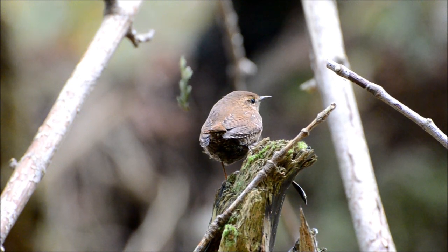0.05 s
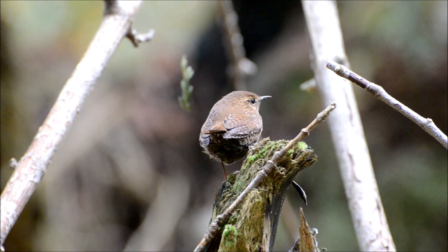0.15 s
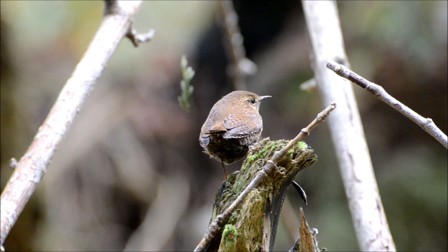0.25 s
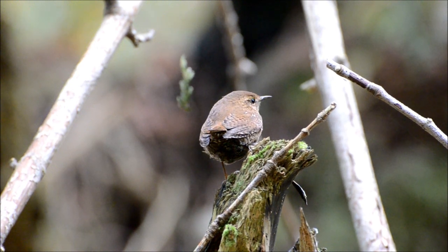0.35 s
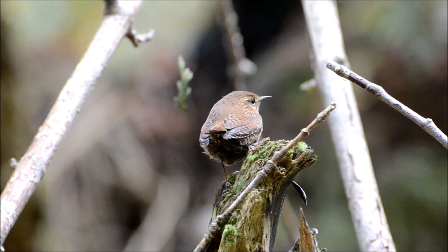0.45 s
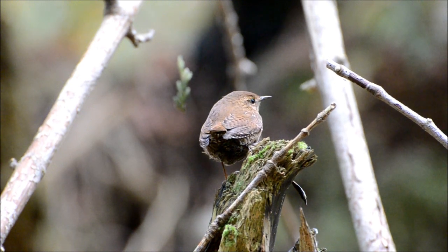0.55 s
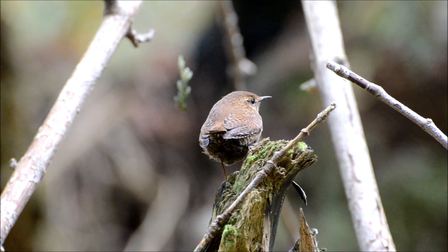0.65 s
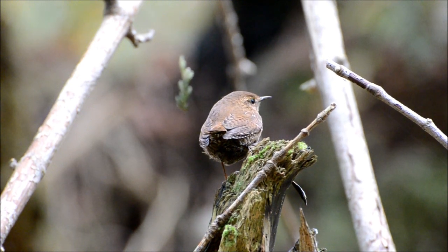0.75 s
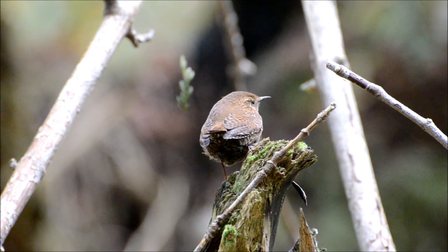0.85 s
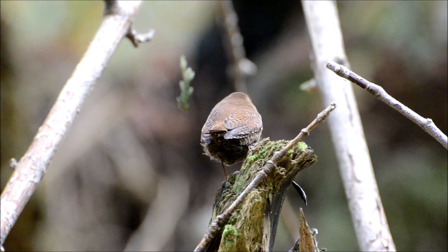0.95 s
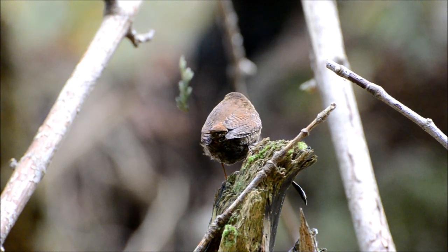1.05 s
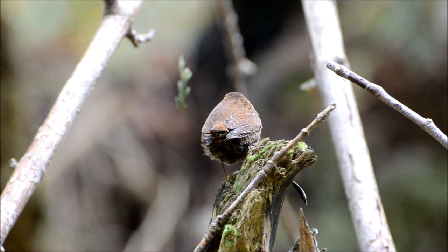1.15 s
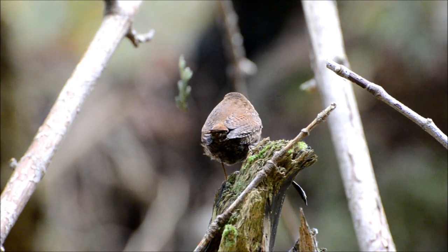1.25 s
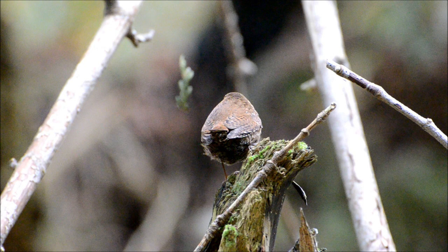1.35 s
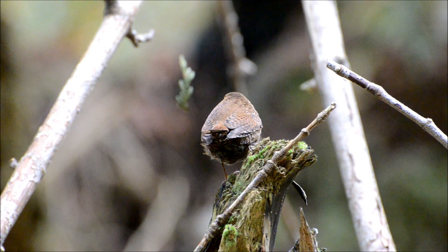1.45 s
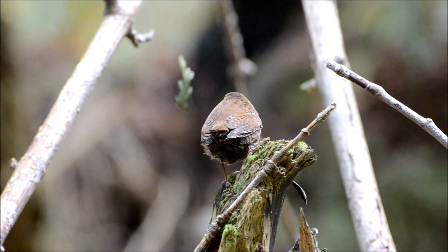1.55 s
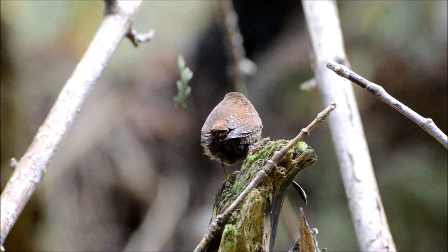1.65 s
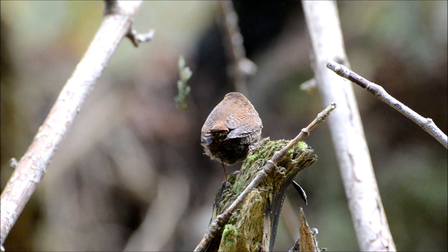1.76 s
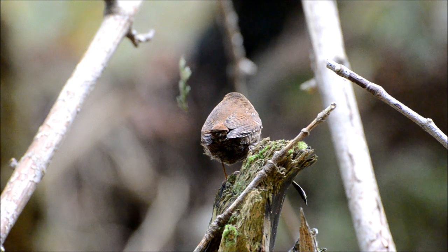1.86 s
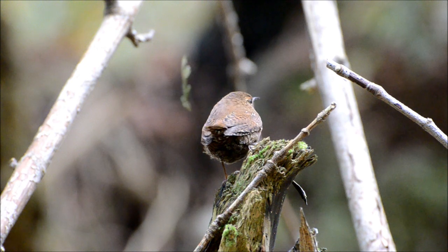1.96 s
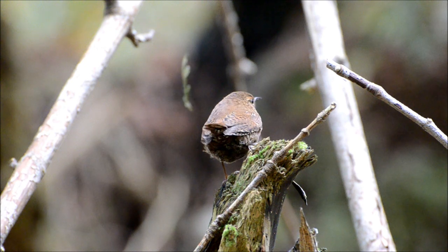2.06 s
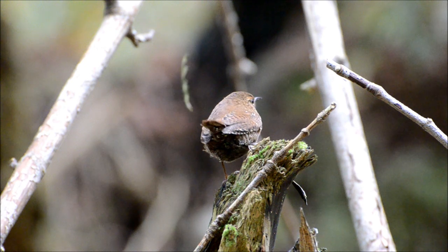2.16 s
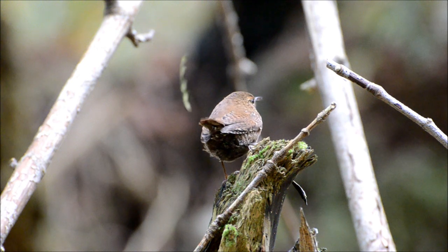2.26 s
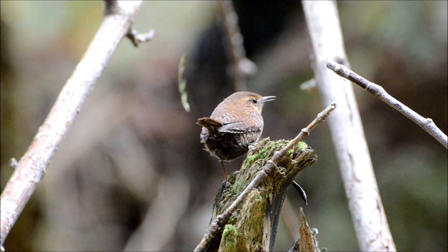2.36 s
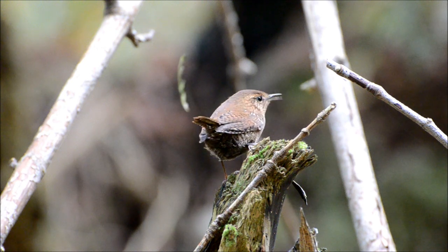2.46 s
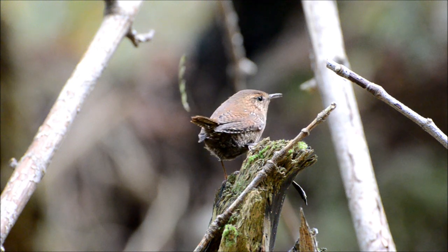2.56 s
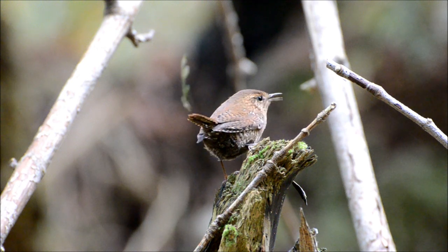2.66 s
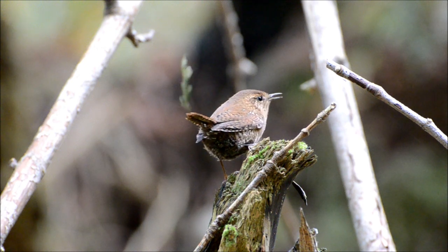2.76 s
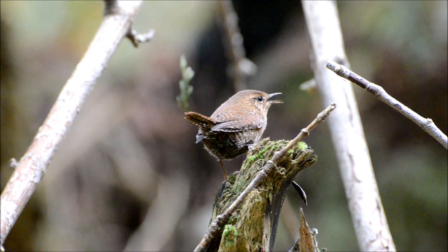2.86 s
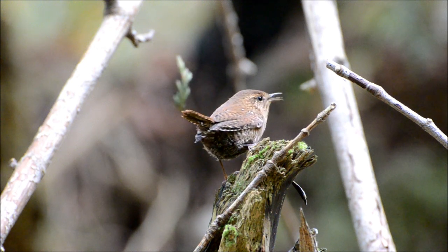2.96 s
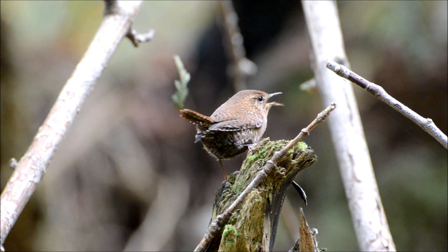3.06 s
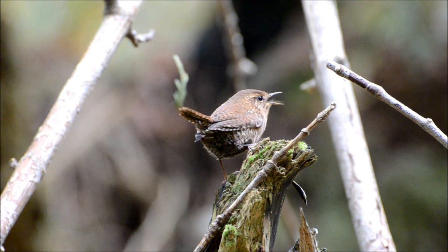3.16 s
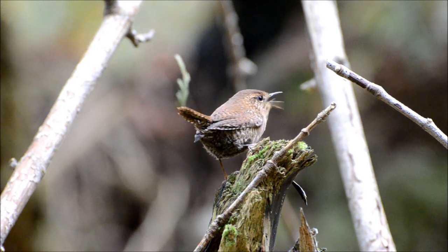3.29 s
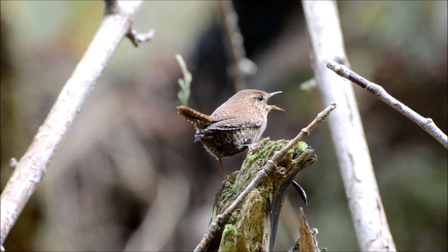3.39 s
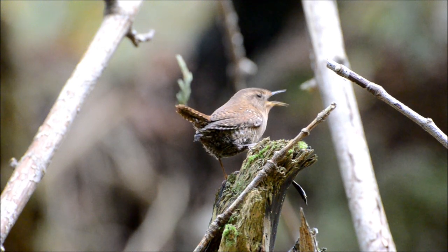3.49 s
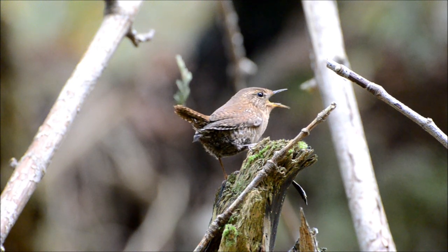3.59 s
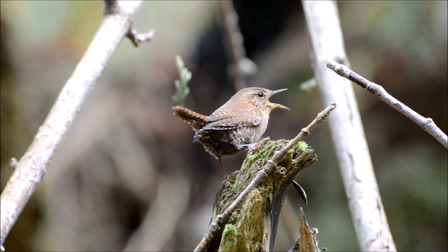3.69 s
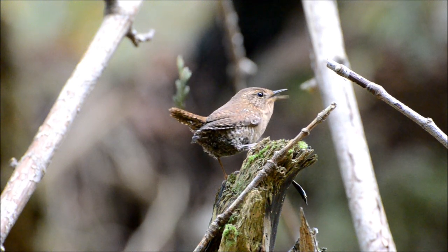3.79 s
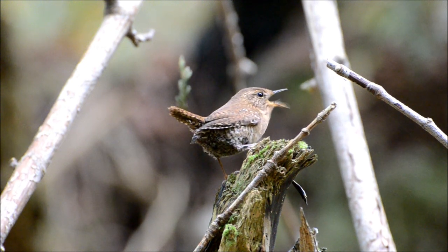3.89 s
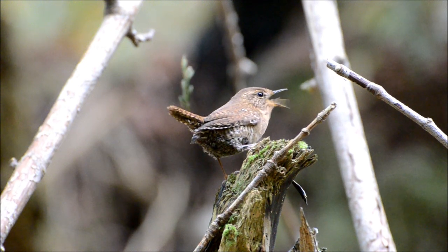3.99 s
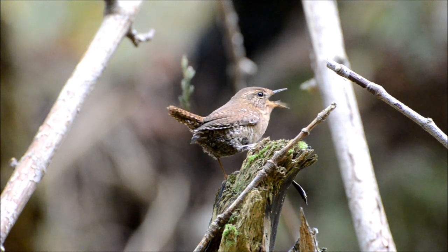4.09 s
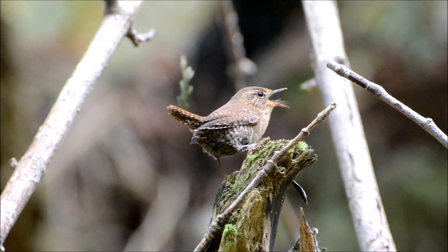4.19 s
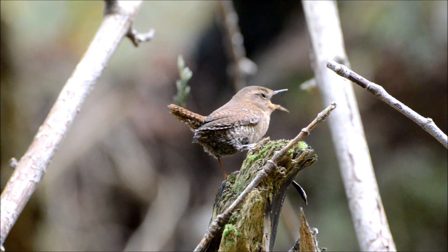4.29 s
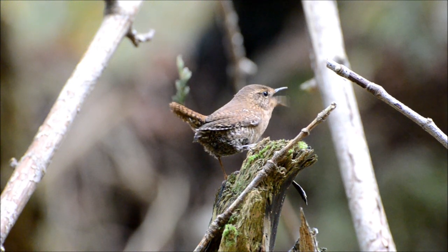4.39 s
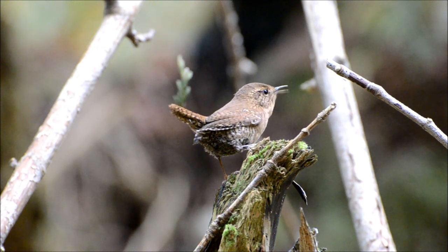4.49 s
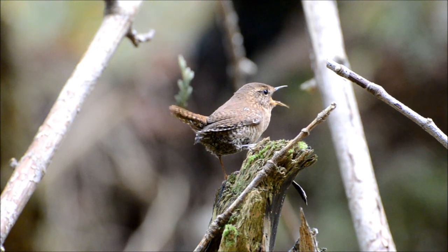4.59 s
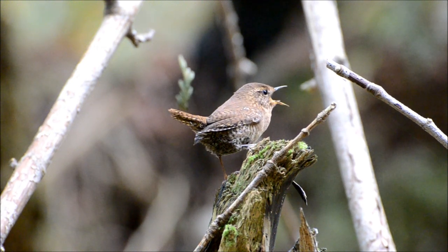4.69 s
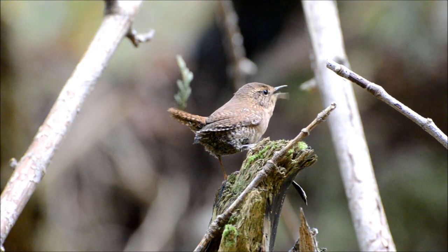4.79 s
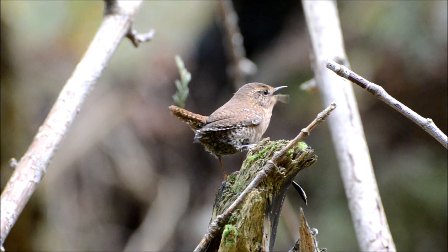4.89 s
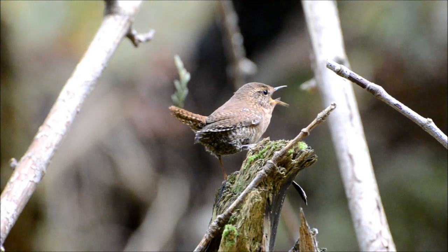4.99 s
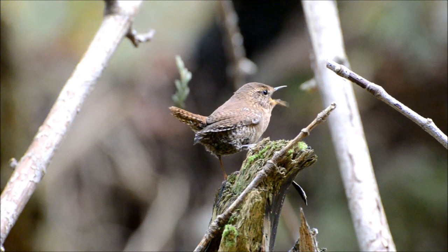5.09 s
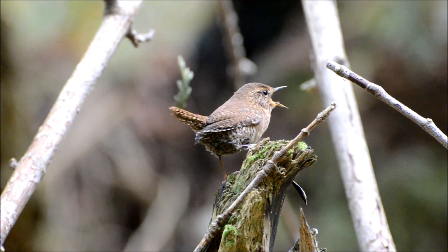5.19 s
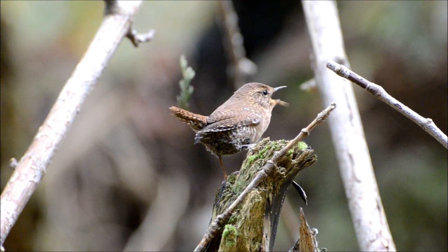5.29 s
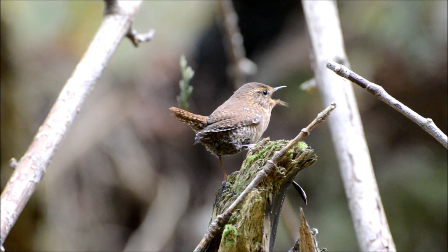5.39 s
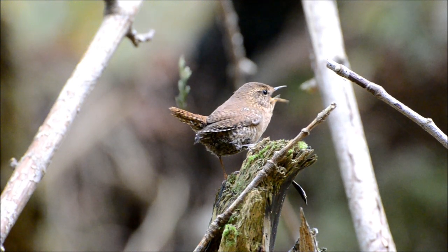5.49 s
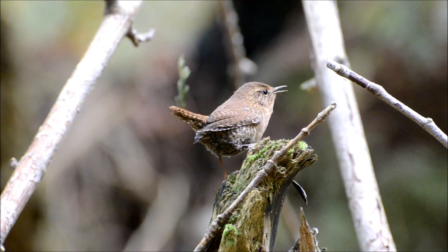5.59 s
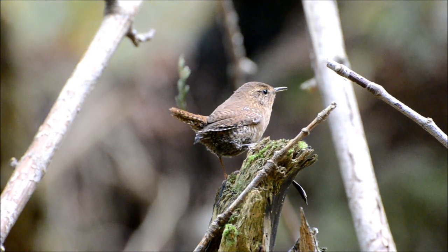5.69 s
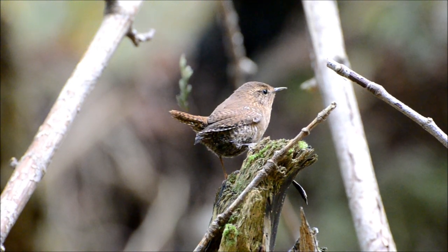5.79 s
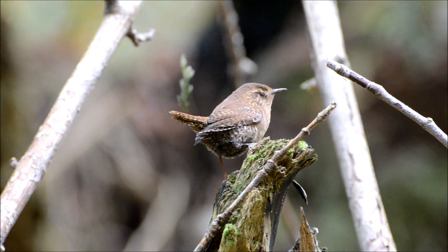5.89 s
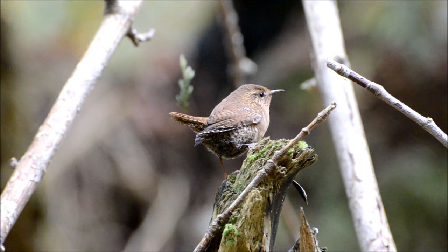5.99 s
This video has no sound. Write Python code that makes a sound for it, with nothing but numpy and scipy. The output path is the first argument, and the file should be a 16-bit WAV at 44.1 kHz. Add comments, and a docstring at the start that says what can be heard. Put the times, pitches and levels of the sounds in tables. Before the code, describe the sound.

First only a low, soft distant roar and a few faint, trembling high whistles from far birds, plus a couple of tiny dry clicks. Then one nearby small bird sings a single continuous song, quiet at first, soon bright and piercing, with fast bouncing, sliding and buzzing notes. It ends suddenly, leaving a brief woodland reverberation and the faint roar. Mono, outdoors.

```python
"""Wren song in a forest

A wren close by sings one tumbling song: a single sine whistle gliding along drawn pitch contours, with faint
overtones and a rasp on fast slides. Noise-like echoes that die away scatter it among the trees.
Thin, blurred whistles of far birds, trembling sine glides, come mostly before it.
Two faint ticks, filtered clicks, and a dull distant roar of coloured noise lie underneath."""
import sys
import numpy as np
from scipy import signal
from scipy.fft import rfft, irfft
from scipy.io import wavfile

SR = 44100
rng = np.random.default_rng(int(sys.argv[2]) if len(sys.argv) > 2 else 0)


def store_wav(level_fs):
    """Save 16-bit WAV to argv[1]."""
    pcm = np.round(np.clip(np.atleast_2d(level_fs), -1, 1) * 32767)
    wavfile.write(sys.argv[1], SR, pcm.T.astype(np.int16))


def convert_level_to_amplitude(level_db):
    """Map a level in decibels to its linear amplitude factor."""
    exponent = np.asarray(level_db, float) / 20
    return 10 ** exponent


N = 266496      # length in samples


def rms_one(x):
    """Scales a signal to an rms of one."""
    return x / np.sqrt(np.mean(x ** 2) + 1e-20)


def smooth(x, ms):
    """A raised-cosine running mean."""
    window = np.hanning(int(ms * SR / 1000) + 3)
    return signal.fftconvolve(x, window / window.sum(), "same")


def random_drift(size, ms):
    """Slow random wandering with an rms of one: smoothed white noise."""
    return rms_one(smooth(rng.standard_normal(size), ms))


def roar():
    """A dull distant roar: smooth noise, humped near 800 Hz, swelling as a whole."""
    # Colour of the roar. Each row: frequency in Hz, relative density in dB per Hz.
    roar_colour = [(20, -12.5), (65, -11), (150, -9.5), (225, -2.5), (450, -6.5), (780, 0), (1150, -3.5),
                   (1600, -12.5), (2600, -25), (5000, -39.5), (5450, -40), (5750, -52.5), (6050, -40),
                   (8500, -38), (11000, -48.5), (15000, -59)]
    # Slow swell of the roar. Each row: time in seconds, rms level in dB.
    roar_swell = [(0.0, -55.5), (3.77, -51.5), (6.04, -52.5)]
    hz, density_db = np.transpose(roar_colour)
    bin_hz = np.arange(1, N // 2 + 2) * SR / N
    colour = convert_level_to_amplitude(np.interp(np.log(bin_hz), np.log(hz), density_db))
    noise = rms_one(irfft(rfft(rng.standard_normal(N)) * colour, N))
    s, level_db = np.transpose(roar_swell)
    return noise * convert_level_to_amplitude(np.interp(np.arange(N) / SR, s, level_db))


def ticks():
    """Faint dry ticks: single-sample clicks, band-passed so that the lows are missing."""
    # Ticks nearby. Each row: time in seconds, click height in dB before the filter.
    tick_list = [(1.055, -53), (1.25, -57)]
    clicks = np.zeros(N)
    for s, db in tick_list:
        clicks[int(s * SR)] = convert_level_to_amplitude(db)
    band = signal.butter(2, [2500, 7000], "band", fs=SR, output="sos")
    return signal.sosfilt(band, clicks + 1e-18)


def far_birds(blur_hz=150, flutter_db=3.5):
    """Each thin whistle arrives smeared: a sine glide whose pitch trembles at random."""
    # Far whistles. Each row: start in seconds, length in seconds, pitch at the start in Hz,
    # pitch at the end in Hz, level in dB before flutter and mix.
    far_whistles = [(0, .06, 8900, 8850, -93), (0.093, 0.41, 7550, 8100, -85),
                    (0.666, 0.063, 8700, 8800, -85), (0.824, 0.22, 7700, 7900, -82.5),
                    (0.945, 0.57, 9000, 8300, -92), (1.014, 0.16, 8320, 7950, -74),
                    (1.087, .04, 8600, 8700, -81), (1.205, 0.094, 8070, 7850, -69.5),
                    (1.352, 0.15, 7680, 7500, -82), (1.403, 0.12, 8450, 8350, -84),
                    (1.58, 0.18, 8400, 8300, -94), (1.915, 0.042, 8500, 8500, -81),
                    (2.019, 0.022, 9000, 8800, -80), (2.09, .02, 9000, 8750, -91)]
    out = np.zeros(N)
    tremble = blur_hz * random_drift(N, 5.0)
    for s, length, start_hz, end_hz, db in far_whistles:
        span = slice(int(s * SR), int((s + length) * SR))
        size = span.stop - span.start
        pitch = np.linspace(start_hz, end_hz, size) + tremble[span]
        whistle = np.sin(2 * np.pi * np.cumsum(pitch) / SR)
        out[span] += convert_level_to_amplitude(db) * signal.windows.tukey(size, .4) * whistle
    return out * convert_level_to_amplitude(flutter_db * random_drift(N, 25.0))      # the level flutters


def strokes():
    """Every unbroken stroke of the whistle as rows (s, Hz, dB), in the order sung."""
    # Syllables that return, by name; each is a few strokes. Each row of a stroke: time in ms before stretch,
    # pitch in Hz before the pitch factor, level in dB over the syllable's level.
    syllables = { "bounce": [[(0, 6700, -12), (7.2, 6400, -4.5), (14.87, 6430, -2), (21.8, 6780, -4),
                 (27.4, 6550, -1)]], "tumble": [[(0, 5450, -11), (3.5, 6300, -2), (8, 6600, 0),
                 (11.5, 6100, -3)], [(17.27, 5600, -9), (23, 5000, 6), (27.9, 3600, -20)], [(35, 6000, -2),
                 (38.8, 7050, -1), (50.5, 7700, -3.5), (58.8, 7500, 1.5), (68.2, 7100, 3.5)]],
                 "arch": [[(0, 7240, -14), (6, 7740, -6.5), (20.1, 7850, 0), (39.5, 7655, -10.5),
                 (54, 7250, -3.5)]], "flick": [[(0, 3300, -30), (3, 4900, -7), (6, 5250, -0.5),
                 (9, 4900, -8)], [(12, 5950, -4.5), (15, 5280, -4), (18, 5180, -6.5)]],
                 "slide": [[(0, 7330, -12), (3.85, 6850, -3.5), (13.72, 6490, -0.5), (24.2, 5930, -0.5),
                 (28.9, 5600, -14)]], "plunge": [[(0, 5900, -11), (3.5, 6500, -3), (7, 6580, -1),
                 (10.5, 6180, -9)], [(16.4, 6450, -3), (20.5, 5450, 0.5), (25.5, 4000, -23),
                 (30.2, 5700, -3.5), (37.3, 6100, 4)], [(42.3, 8160, -9.5), (52, 7530, 1.5),
                 (68.4, 7760, -5), (84, 7520, -4), (92.5, 7085, 1.5), (98, 6850, -11), (104, 6800, -11)]],
                 "pair": [[(0, 6600, -12), (4, 6750, -3), (10, 6750, -3)], [(11.95, 9170, -29),
                 (15.34, 7530, -0.5), (26.84, 7380, -3.5)]], }
    # Where they are sung. Each row: start in seconds, syllable name, level in dB before the mix,
    # stretch in time (ratio), pitch factor (ratio).
    sung = [(2.346, "bounce", -50, .92, 1.001), (2.618, "bounce", -43, .99, .999),
            (3.054, "tumble", -36.5, 1.04, 1.002), (3.148, "tumble", -35, .99, 1.017),
            (3.245, "tumble", -34.5, 1.01, 1.025), (3.505, "arch", -23, 1.001, 1.002),
            (3.652, "arch", -23, .98, 1.005), (3.896, "flick", -28, 1.001, .999),
            (3.967, "flick", -30.5, 1.001, 1.007), (4.037, "flick", -29, 1.001, 1.006),
            (4.111, "flick", -31.5, .96, 1.001), (3.847, "slide", -28.5, 1.04, 1.02),
            (3.917, "slide", -28, 1.001, 1.002), (3.988, "slide", -28.5, .93, 0.997),
            (4.059, "slide", -27.5, .97, 1.017), (4.133, "slide", -27.5, .96, 1.025),
            (4.965, "plunge", -30, 1.015, 1.005), (5.099, "plunge", -30, 0.97, .999),
            (5.23, "pair", -28.5, .97, 1), (5.28, "pair", -28.5, 1.03, 1), (5.332, "pair", -31, .97, 0.98),
            (5.387, "pair", -30.5, 1.001, 1)]
    # Plain glides. Each row: start in seconds, length in ms, pitch from in Hz, pitch to in Hz,
    # peak level in dB before the mix.
    glides = [(1.919, 16, 5000, 4650, -68), (2.019, 51, 6190, 5300, -64), (2.099, 14.5, 4550, 4370, -61.5),
              (2.148, 26.6, 4660, 5400, -56.5), (2.182, 12, 4800, 4100, -57), (2.381, 8.5, 5710, 3820, -52),
              (2.389, 13, 3940, 5630, -52), (2.53, 24.6, 3660, 4420, -54.5), (2.688, 18, 5016, 3610, -41),
              (2.714, 15, 3510, 4360, -42), (2.909, 13, 5250, 3850, -39), (2.924, 7.2, 4280, 3450, -40.5),
              (3.461, 15.6, 4380, 5760, -31), (3.827, 2.5, 4780, 5340, -30), (3.831, 6, 6300, 5880, -34),
              (3.842, 4.3, 6230, 6050, -32.5), (4.469, 7.3, 3875, 2870, -43), (4.482, 6.2, 3510, 2870, -46),
              (4.493, 8.5, 3950, 4330, -37.5)]
    # Bent notes sung once, one contour each. Each row of a note: time in seconds, pitch in Hz,
    # level in dB before the mix.
    flourishes = [
        [(1.951, 2950, -71), (1.9613, 4400, -61), (1.9697, 5000, -64), (1.976, 5030, -67)],
        [(2.238, 6500, -70), (2.249, 7050, -57), (2.264, 6960, -54), (2.28, 6580, -53), (2.287, 6700, -53),
         (2.2965, 7720, -53.5), (2.309, 7060, -57)],
        [(2.448, 7940, -58), (2.4525, 8070, -47), (2.458, 7500, -66), (2.464, 7580, -51), (2.4777, 7890, -53.5),
         (2.491, 7100, -51)],
        [(2.563, 5100, -59), (2.568, 4450, -54), (2.5763, 4200, -46), (2.582, 4250, -47)],
        [(2.673, 5120, -53), (2.6795, 5460, -49), (2.686, 5160, -61)],
        [(2.764, 6960, -50.5), (2.7715, 8110, -40), (2.78, 8000, -43), (2.7915, 7140, -32), (2.803, 6920, -45),
         (2.815, 7030, -38.5), (2.826, 6960, -48.5)],
        [(2.853, 4590, -64), (2.857, 4820, -50.5), (2.873, 4510, -39), (2.885, 4490, -44)],
        [(2.938, 4387, -43), (2.9431, 4930, -41), (2.9499, 5230, -37), (2.955, 5130, -45.5)],
        [(2.977, 5880, -51), (2.99, 5880, -37), (2.9973, 6200, -33), (3.0097, 6330, -30.5), (3.024, 5790, -39),
         (3.029, 6060, -28.5)],
        [(3.346, 7410, -39), (3.3517, 7850, -32.5), (3.3593, 7870, -22.5), (3.365, 7600, -33.5),
         (3.3725, 7150, -30.5), (3.3825, 7150, -21), (3.39, 7500, -31)],
        [(3.424, 3900, -47), (3.4435, 4157, -31.5), (3.453, 3847, -38), (3.457, 3280, -47)],
        [(3.586, 6770, -44), (3.5905, 7120, -26), (3.595, 7150, -36), (3.6, 8410, -38), (3.604, 7350, -23),
         (3.61, 6580, -36), (3.614, 6000, -30.5), (3.621, 6630, -28), (3.629, 6540, -36)],
        [(3.743, 4380, -57), (3.748, 4996, -34), (3.7555, 4660, -34.5), (3.766, 3910, -36.5),
         (3.779, 4900, -28.5), (3.7925, 4203, -35), (3.798, 4360, -38)],
        [(4.185, 5200, -37), (4.191, 5000, -27.5), (4.197, 4926, -30), (4.207, 4914, -26), (4.219, 4515, -36.5),
         (4.224, 3300, -63)],
        [(4.252, 5830, -38.5), (4.269, 6610, -27), (4.281, 7370, -19), (4.293, 6680, -28), (4.3, 5910, -28),
         (4.31, 5220, -32.5), (4.316, 5090, -25), (4.325, 5090, -30), (4.332, 5940, -29), (4.336, 5960, -33.5)],
        [(4.381, 3330, -62), (4.386, 3766, -44.5), (4.3965, 3830, -31), (4.407, 3450, -36)],
        [(4.438, 4150, -47), (4.446, 4220, -31), (4.454, 4454, -30), (4.463, 3874, -32.5), (4.467, 3380, -39)],
        [(4.548, 8350, -44.5), (4.559, 7830, -26), (4.57, 7850, -29.5), (4.5885, 7375, -28.5),
         (4.62, 7340, -33), (4.694, 7400, -34)],
        [(4.729, 5000, -50), (4.733, 6110, -31), (4.743, 5740, -41), (4.7595, 5060, -23.5), (4.767, 4810, -36),
         (4.771, 3595, -59)],
        [(4.788, 3500, -49), (4.794, 3800, -39), (4.816, 2880, -47.5), (4.82, 3660, -57), (4.824, 3960, -35),
         (4.829, 4100, -47)],
        [(4.87, 5890, -35), (4.891, 6030, -32.5), (4.912, 6120, -30), (4.9168, 6790, -31), (4.9255, 7230, -25),
         (4.938, 6490, -34)],
        [(5.455, 6670, -36.5), (5.472, 6040, -33.5), (5.489, 5084, -37.5), (5.497, 5177, -28.5),
         (5.505, 5250, -35)],
    ]
    out = [np.array(note) for note in flourishes]
    for s, name, db, stretch, factor in sung:
        for stroke in syllables[name]:
            out.append(np.array(stroke) * [stretch / 1000, factor, 1] + [s, 0, db])
    share = np.array([0, .6, 1])      # a glide swells to its peak at 0.6 of its length
    swell_db = np.array([-6, 0, -5])
    for s, ms, from_hz, to_hz, db in glides:
        seconds = s + share * ms / 1000
        pitch = from_hz + share * (to_hz - from_hz)
        out.append(np.c_[seconds, pitch, db + swell_db])
    return sorted(out, key=lambda stroke: stroke[0, 0])


def overtones(level, pitch, phase, octave_db=-54, twelfth_db=-75, growth=.5, throat_hz=11000):
    """Octave and twelfth come and go, stronger on low notes; they grow more slowly than the whistle."""
    lowness = np.log2(6000 / pitch)      # octaves below 6 kHz
    octave = convert_level_to_amplitude(octave_db + 6 * lowness) * np.sin(2 * phase)
    # the twelfth sounds only where it stays well below half the sample rate
    twelfth = convert_level_to_amplitude(twelfth_db + 15 * lowness) * (pitch < SR / 7) * np.sin(3 * phase)
    patches = convert_level_to_amplitude(3.0 * random_drift(N, 30.0))
    strength = np.abs(level) ** growth * patches
    throat = signal.butter(3, throat_hz, fs=SR, output="sos")
    return signal.sosfilt(throat, strength * (octave + twelfth))


def rasp(level, slide, rasp_db=-21.5, fast_hz_per_ms=200, low_hz=8500, high_hz=11500):
    """Bright band-passed noise that flares where the pitch slides fast."""
    flare = level * smooth(np.tanh((slide / fast_hz_per_ms) ** 2), 6.5)
    band = signal.butter(2, [low_hz, high_hz], "band", fs=SR, output="sos")
    return convert_level_to_amplitude(rasp_db) * signal.sosfilt(band, flare * rng.standard_normal(N))


def wren(glide_ms=1.2, edge_ms=2.5, waver_db=1.14):
    """One sine whistle follows each note's contour; overtones and a rasp on fast slides come with it."""
    # The buzzy long note: start in seconds, end in seconds, wobbles per second,
    # pitch swing to either side in Hz.
    buzz = (4.578, 4.698, 140, 200)
    t = np.arange(N) / SR
    song = strokes()
    s, hz, db = np.concatenate(song).T
    s = np.maximum.accumulate(s)      # one voice: time never runs back where strokes overlap
    sounding = np.zeros(N)
    for note in song:
        sounding[int(note[0][0] * SR):int(note[-1][0] * SR)] = 1
    pitch = smooth(np.interp(t, s, hz), glide_ms)
    level = smooth(sounding * convert_level_to_amplitude(np.interp(t, s, db)), edge_ms)
    level *= convert_level_to_amplitude(waver_db * random_drift(N, 4.8))
    slide = np.abs(np.gradient(pitch)) * SR / 1000      # Hz per ms
    start, end, per_s, swing_hz = buzz
    buzzing = smooth(1. * (t > start) * (t < end), 6.6)
    pitch += swing_hz * buzzing * np.sin(2 * np.pi * per_s * (t - start))
    phase = 2 * np.pi * np.cumsum(pitch) / SR
    return level * np.sin(phase) + overtones(level, pitch, phase) + rasp(level, slide)


def forest(x, t60_s=0.61, near_db=15.5, near_ms=25, first_echo_ms=6, clump_db=2.5, leaf_cut_hz=9000):
    """Trunks and leaves return a dense dying scatter, strongest from the nearest branches; gain 1 in energy."""
    t = np.arange(SR) / SR
    decay_db = -60 * t / t60_s + near_db * np.exp(-1000 * t / near_ms)
    scatter = rng.standard_normal(SR) * convert_level_to_amplitude(decay_db)
    scatter *= 1 - np.exp(-(1000 * t / first_echo_ms) ** 2)      # nothing stands right beside the bird
    scatter *= convert_level_to_amplitude(clump_db * random_drift(SR, 8.7))      # trunks stand in uneven clumps
    dull = signal.sosfilt(signal.butter(2, leaf_cut_hz, fs=SR, output="sos"), scatter)
    late = 1 - np.exp(-t / 0.069)      # later returns have crossed more leaves
    scatter = (1 - late) * scatter + late * dull
    return signal.fftconvolve(x, scatter / np.sqrt(np.sum(scatter ** 2)))[:N]


def scene():
    """Mixes the direct whistles, their scatter among the trees, the ticks and the roar, in mono."""
    song, far = wren(), far_birds()
    direct = convert_level_to_amplitude(1.5) * song + .5 * far
    scattered = forest(convert_level_to_amplitude(-8) * song + far)
    return (direct + scattered + ticks() + roar())[None]


def low_pass(x):
    """Removes everything above the highest recorded frequency."""
    return signal.sosfilt(signal.butter(12, 15680, fs=SR, output="sos"), x)


def record(dry):
    """Returns the finished mix as it is heard."""
    return low_pass(dry)


dry = scene()
out = record(dry)
store_wav(out)
```